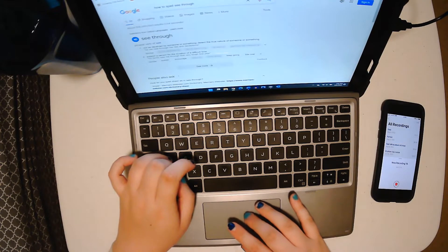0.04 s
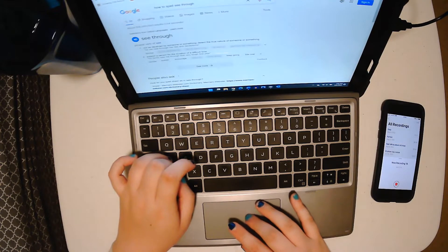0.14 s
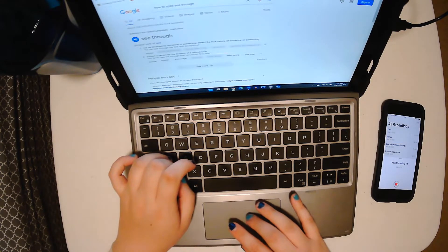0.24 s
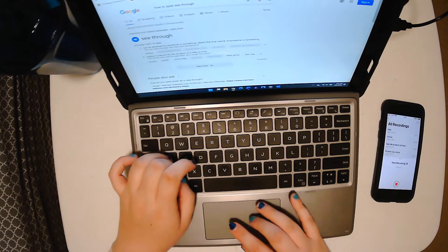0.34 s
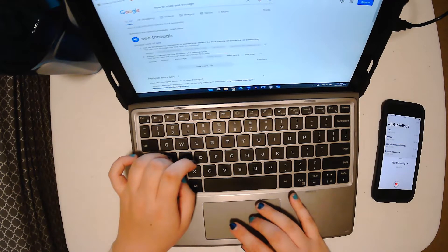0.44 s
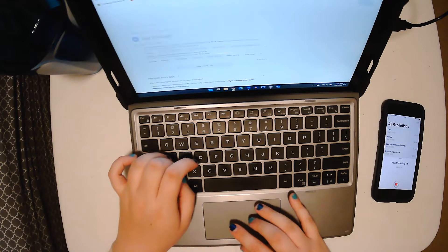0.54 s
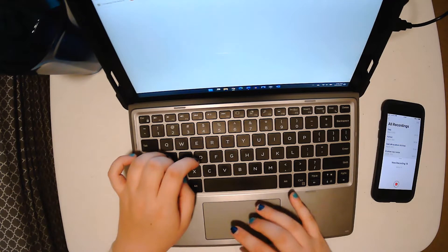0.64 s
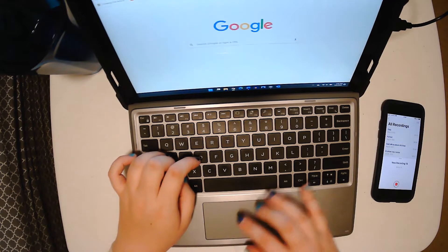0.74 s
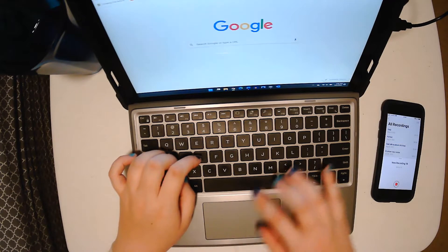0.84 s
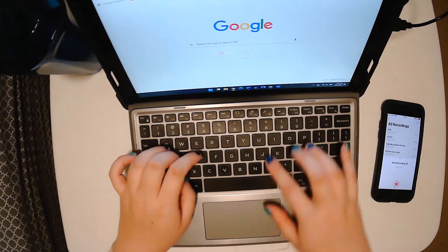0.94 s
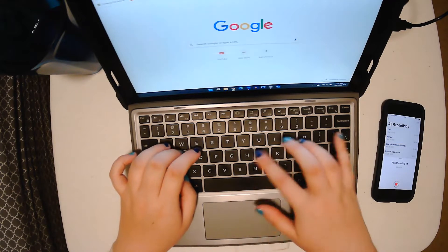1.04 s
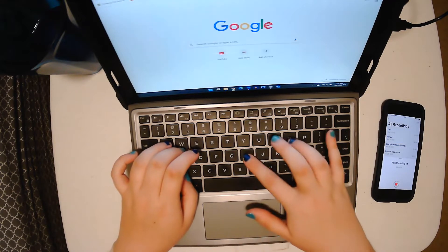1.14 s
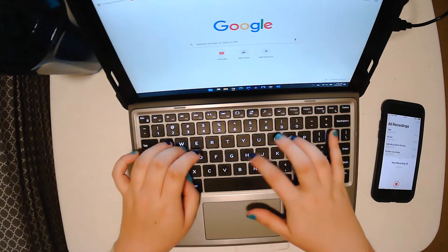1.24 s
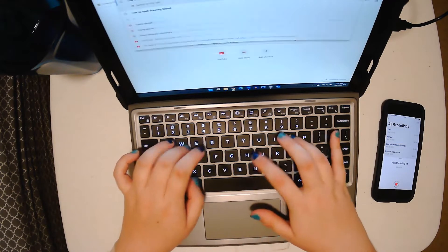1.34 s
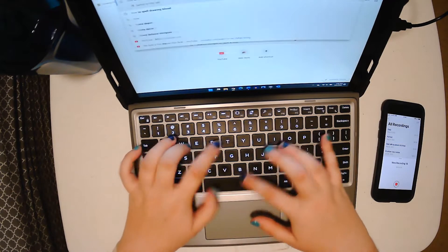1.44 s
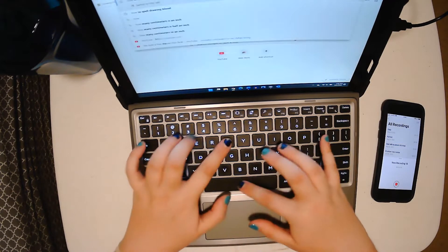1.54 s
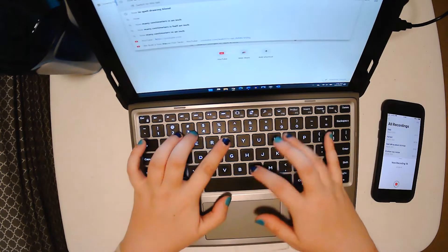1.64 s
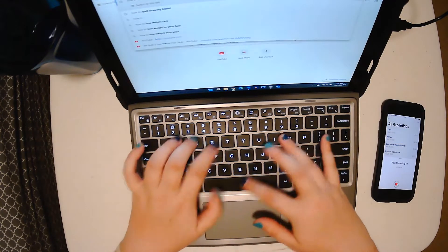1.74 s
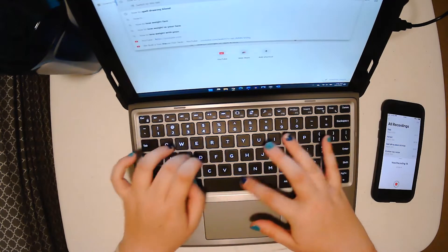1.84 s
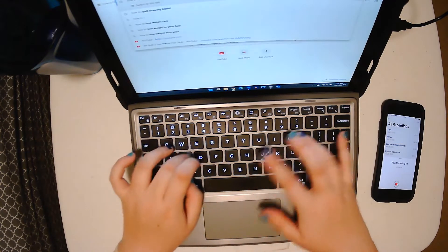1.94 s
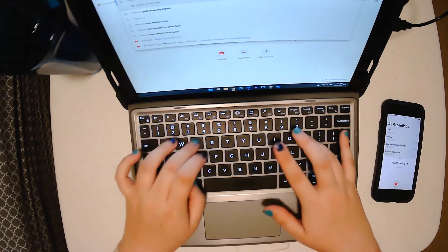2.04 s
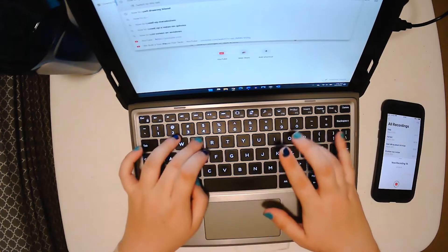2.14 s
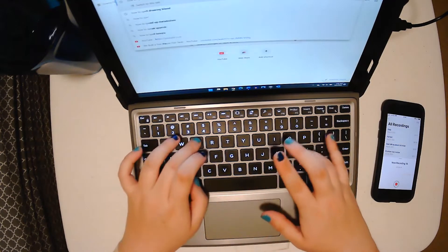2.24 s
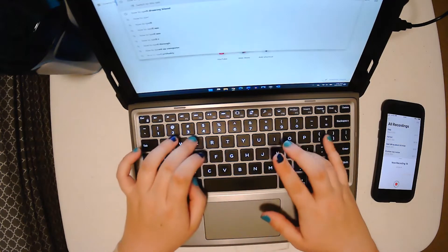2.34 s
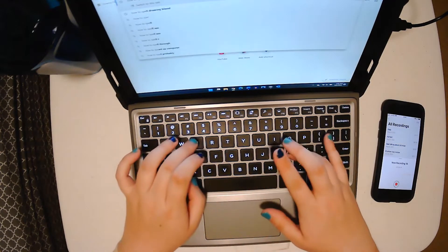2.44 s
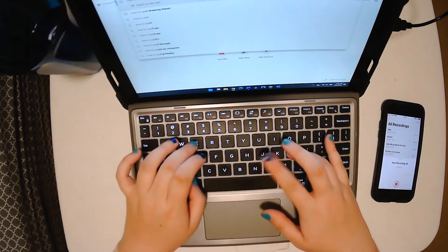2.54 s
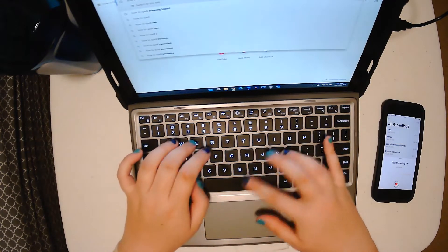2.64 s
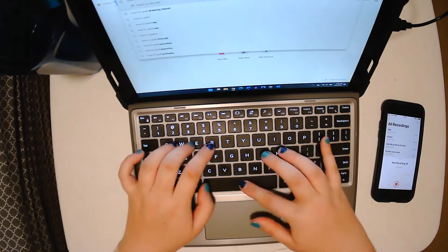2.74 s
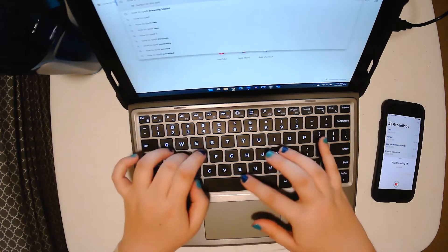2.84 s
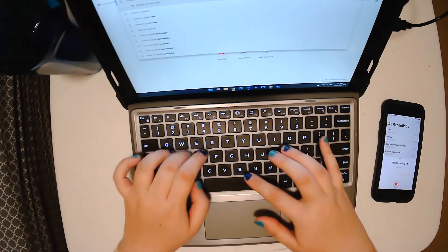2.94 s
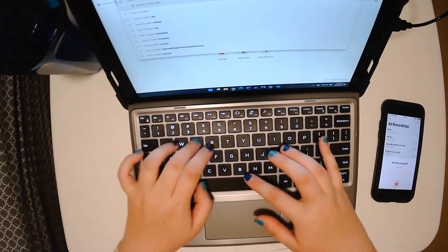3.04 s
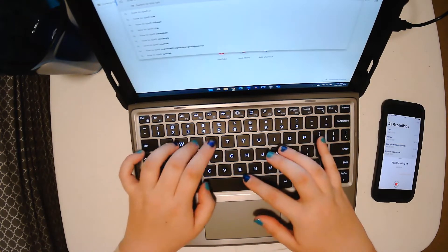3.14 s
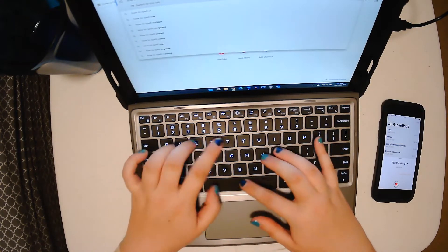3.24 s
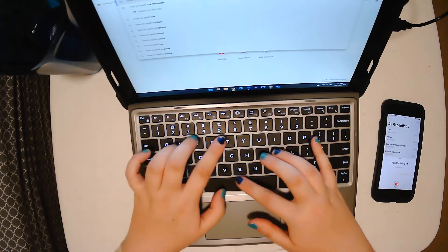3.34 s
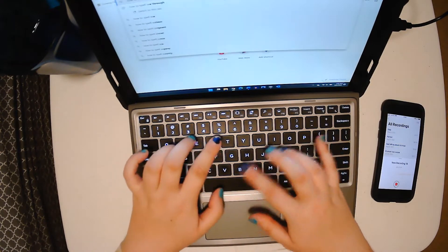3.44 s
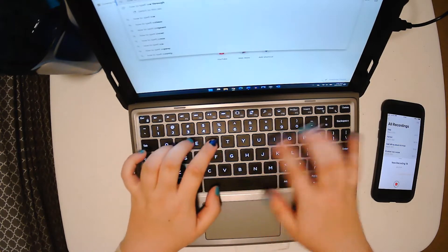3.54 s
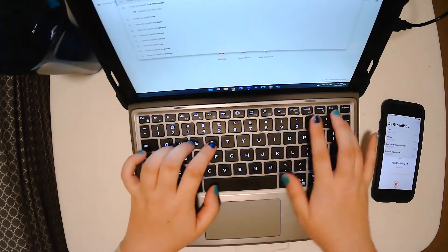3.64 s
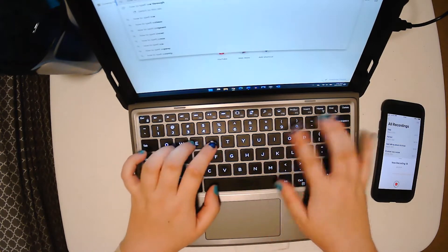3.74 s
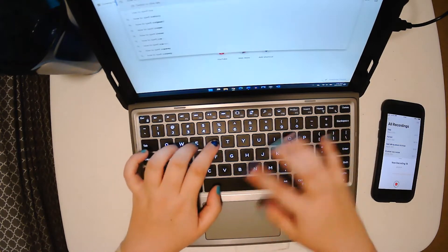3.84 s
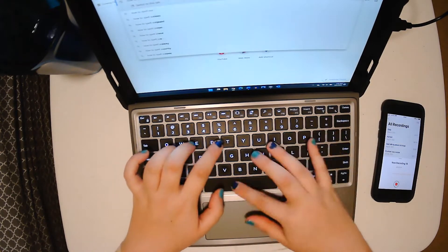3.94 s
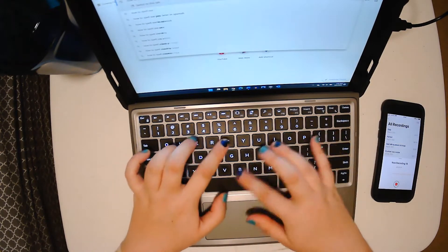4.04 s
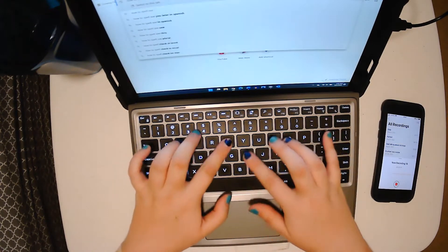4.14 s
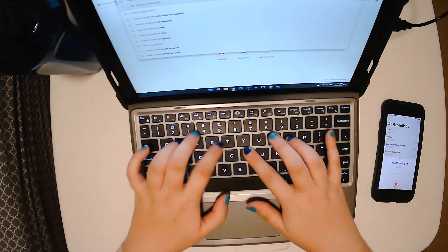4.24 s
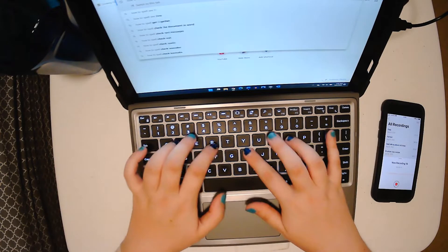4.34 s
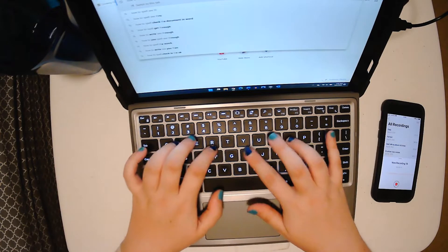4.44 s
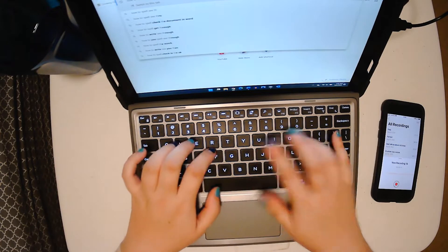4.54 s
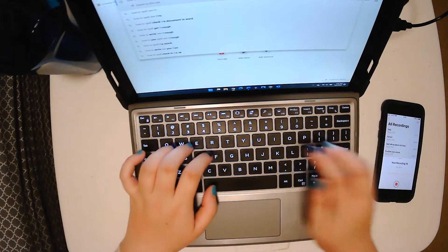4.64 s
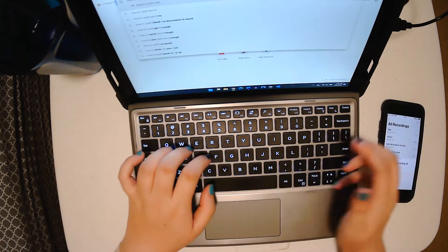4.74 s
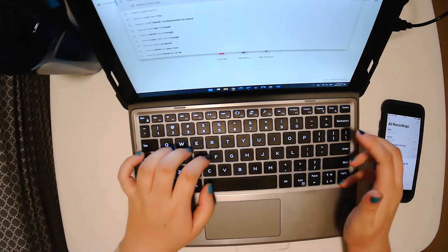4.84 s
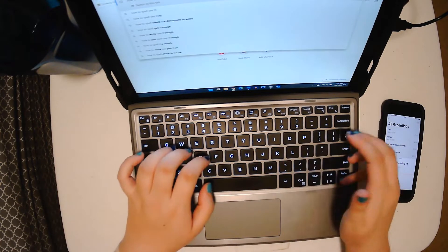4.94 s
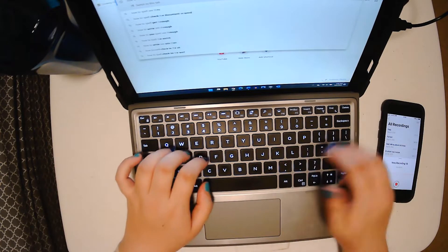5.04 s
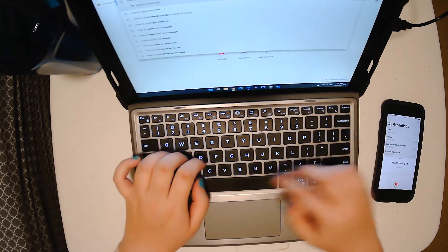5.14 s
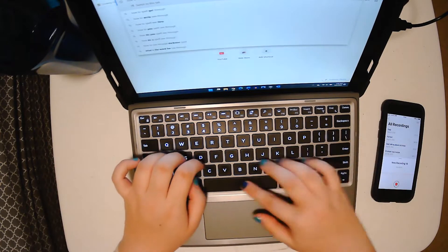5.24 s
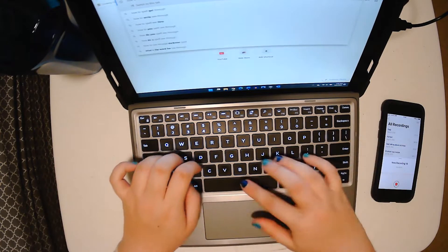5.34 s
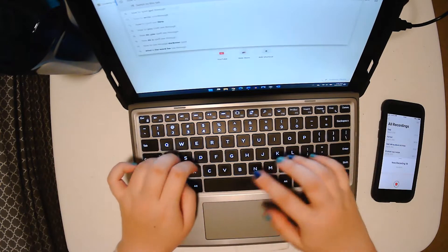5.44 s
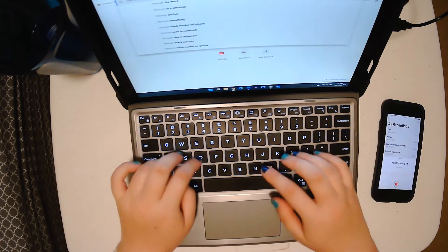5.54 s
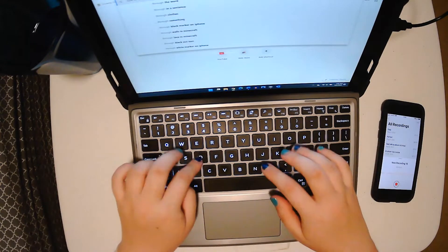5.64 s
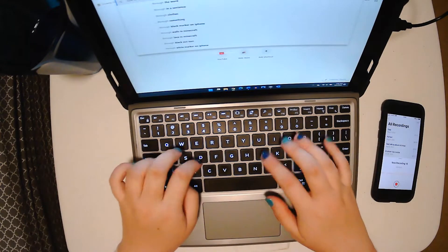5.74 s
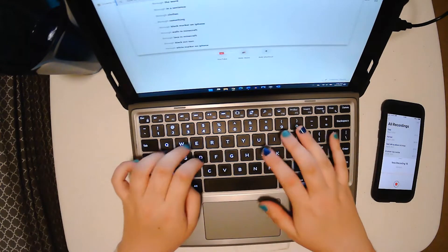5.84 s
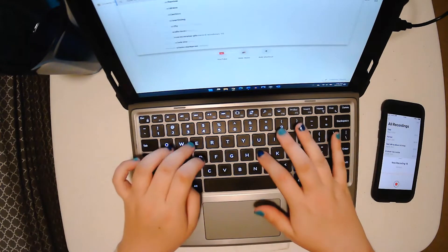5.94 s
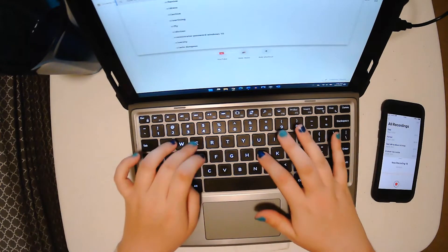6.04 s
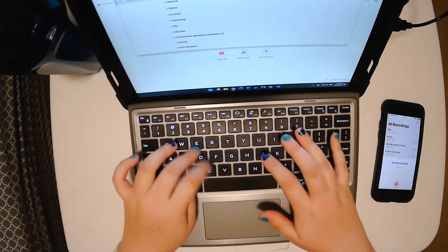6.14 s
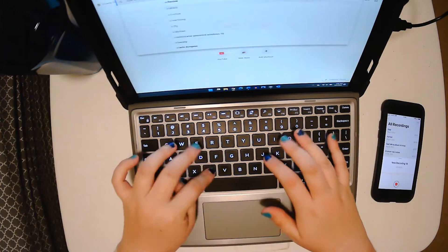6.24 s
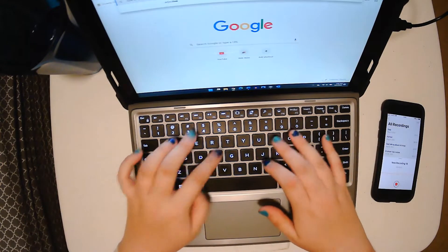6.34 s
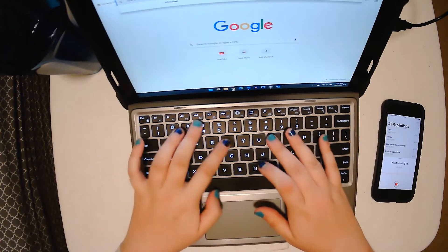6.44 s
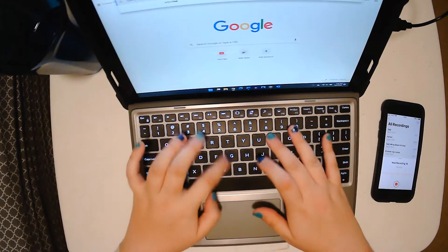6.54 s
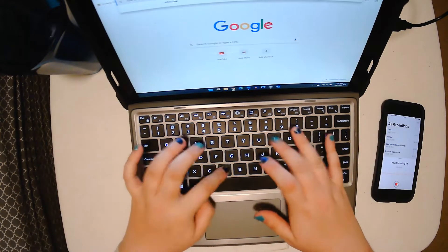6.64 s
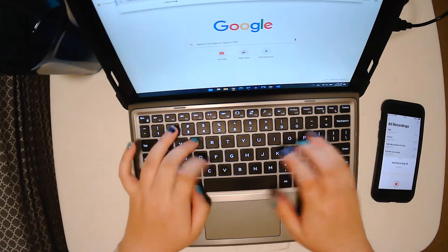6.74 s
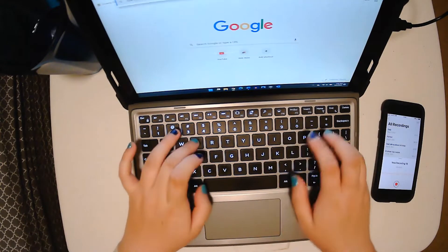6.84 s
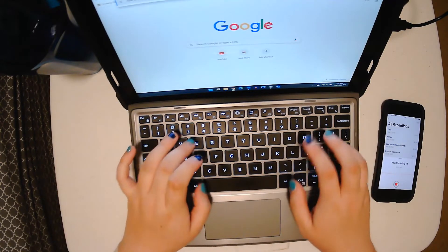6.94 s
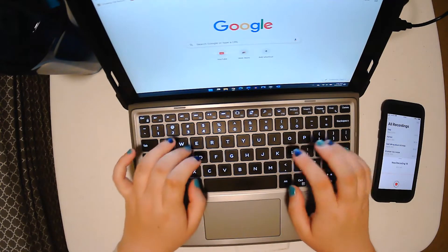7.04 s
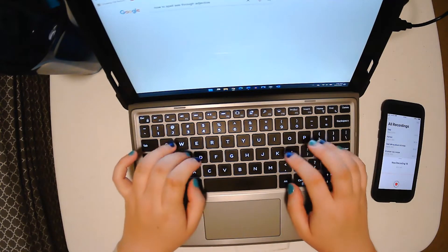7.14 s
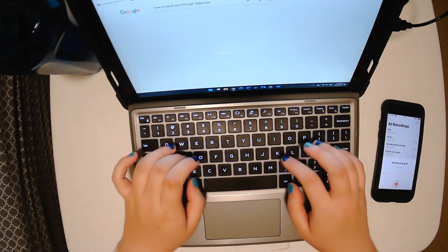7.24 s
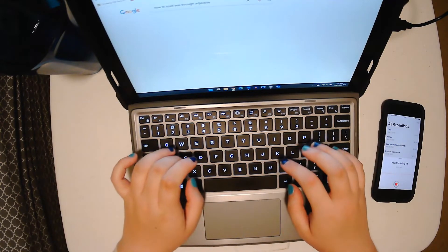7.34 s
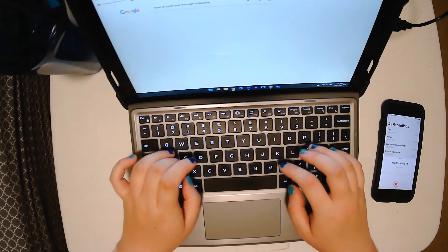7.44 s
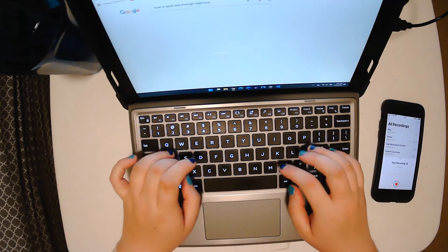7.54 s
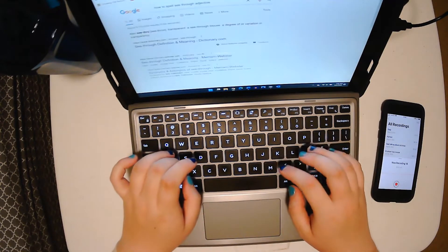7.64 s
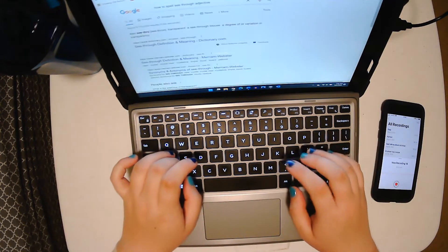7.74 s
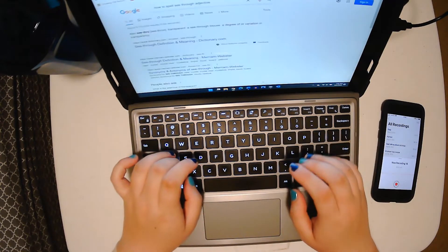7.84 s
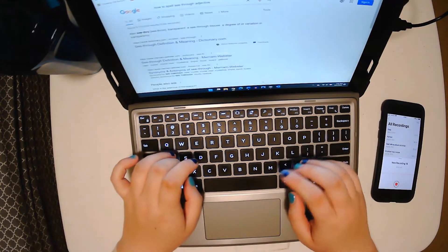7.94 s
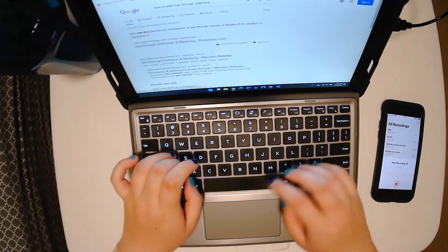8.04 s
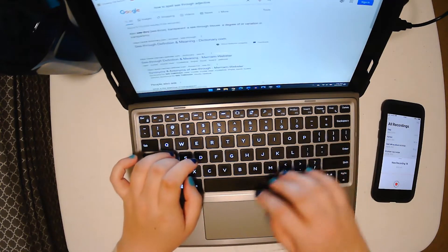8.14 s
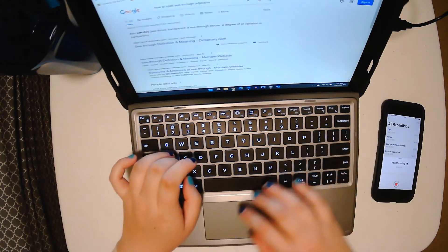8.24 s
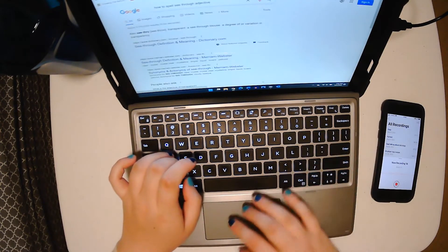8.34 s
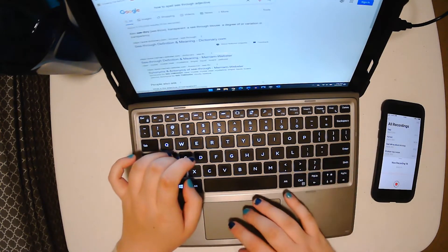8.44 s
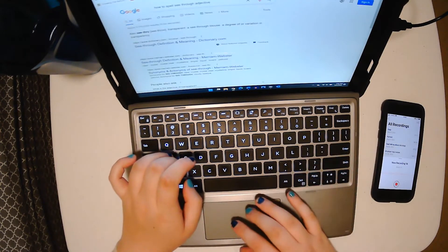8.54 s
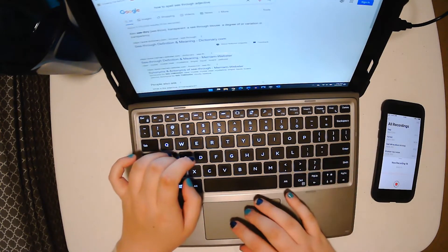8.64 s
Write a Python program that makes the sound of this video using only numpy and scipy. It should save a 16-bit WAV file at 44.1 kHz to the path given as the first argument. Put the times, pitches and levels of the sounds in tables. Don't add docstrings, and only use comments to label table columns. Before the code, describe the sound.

A quiet small room, close microphone, deep steady hum and faint air hiss. For the first 0.7 seconds almost nothing, just one faint low bump near 0.3. At about 0.8 to 0.9 a light tap, skin brush and tiny squeak. From 1.35 to 2.4 fingers type rapidly: crisp plastic snaps, short hollow key notes, low table thumps and heavier spacebar knocks near 1.8 to 2.0. Another run goes from 2.6 to 3.5, then scattered strokes from 3.8 to 4.6. Soft rubbing and faint touches around 4.7 to 5.0 as a hand shifts. Single keys at 5.1 to 5.9, including a strong spacebar clack at 5.4. A brisk run from 6.1 to 7.0 ends in a large key at 7.1 that bounces, rocks and rings the case until 7.2. Near stillness, with a faint thump at 7.6, then a brush and one short, solid touchpad knock at 8.26; hum remains. Treble briefly drops out now and then.

```python
import sys
import numpy as np
from scipy import signal
from scipy.fft import rfft, irfft, next_fast_len
from scipy.io import wavfile
from scipy.ndimage import uniform_filter1d, map_coordinates

SR = 44100
rng = np.random.default_rng(int(sys.argv[2]) if len(sys.argv) > 2 else 0)


def undo_db(level):
    steps = np.asarray(level, float) / 20
    return 10 ** steps


def to_wav(s):
    ch = np.atleast_2d(s).T
    pcm = np.round(np.clip(ch, -1, 1) * 32767)
    wavfile.write(sys.argv[1], SR, pcm.astype(np.int16))


N = 383229

# frequency in Hz, level in dB per Hz.
AIR_COLOUR = [(26, -43), (45, -2.5), (48, -11), (81, -16), (124, -14), (184, -21), (532, -33), (617, -34.5),
              (2290, -40.5), (12600, -51), (16500, -64)]
# pitch in Hz, level in dB rms.
HUM_TONES = [(26.6, -50.5), (119, -70)]
# frequency in Hz, t60 in seconds.
ROOM_DECAY = [(150, 0.38), (1000, 0.33), (4000, 0.33), (10000, 0.17), (15500, 0.083)]

# centre in seconds, level in dB, pitch in Hz, half length in seconds.
SQUEAKS = [(.775, -73, 5600, 0.031), (.83, -65, 2900, .02), (.872, -49.5, 2640, 0.015),
           (.865, -59, 5400, 0.027), (2.3, -70, 2320, 0.11), (4.4, -69, 2300, 0.18), (4.4, -73, 3500, .15),
           (4.8, -73, 2600, 0.11), (4.72, -71, 3330, .06), (7.77, -77, 2300, .1)]
# frequency in Hz, level in dB per Hz.
SKIN_COLOUR = [(250, 6), (480, 3), (1100, -1.5), (1900, -6), (2400, -2.5), (3000, -5.5), (3600, -7.5),
               (9500, -20.5), (15500, -32.5)]
# peak in seconds, level in dB, brightness in dB, fade in seconds.
SWEEPS = [(0.868, -50.5, 6, 0.016), (1.162, -56, 7.5, 0.071), (1.42, -68, 10.5, 0.032),
          (4.045, -62, -2, 0.047), (4.303, -51.5, 0, 0.016), (4.41, -66.5, -0.5, 0.15),
          (4.97, -57.5, 1, 0.072), (5.212, -60, 4, 0.009), (5.375, -58.5, 4, 0.055),
          (6.47, -58.5, 3.5, 0.011), (6.65, -63.5, 0, 0.063), (6.82, -61.5, -1, 0.11),
          (8.288, -56, 5.5, 0.028)]
# peak in seconds, level in dB, brightness in dB, fade in seconds.
SCUFFS = [(.78, -58.5, 3, 0.07), (1.28, -73, -8, 0.26), (1.72, -57.5, 1.5, 0.1), (1.97, -55.5, -0.5, 0.08),
          (2.06, -77, 13, 0.26), (4.53, -74, -7.5, 0.094), (4.693, -66, -10, 0.037), (4.8, -61.5, .5, 0.1),
          (5.445, -62, -3, 0.069), (6.155, -63, 2, 0.067)]

# frequency in Hz, level in dB, t60 in seconds.
DECK_MODES = [(167.4, -6, 0.11), (201.4, 3.5, 0.059), (280, -9, 0.054)]
# frequency in Hz, level in dB, t60 in seconds.
DRUM_MODES = [(197.6, 4, 0.19), (205, -11, 0.15)]
# frequency in Hz, level in dB, t60 in seconds.
TABLE_MODES = [(50.1, 3.5, 0.322), (73.55, 1.5, 0.32)]
# frequency in Hz, level in dB, t60 in seconds.
LID_MODES = [(105, 2.5, 0.13), (119.3, -0.5, 0.17)]
# frequency in Hz, level in dB.
CASE_COLOUR = [(300, -6), (400, -1), (520, -2.5), (650, -10), (780, -8), (1000, -21), (1600, -31)]
# start in seconds, deck in dB, then table, lid and case in dB re deck.
HOLLOW_BLOWS = [(1.479, -28.5, -2.5, -3.5, -1.5), (2.181, -33.5, 1.5, -2, 1), (2.254, -41, -7, -13, 0.5),
                (3.83, -35.5, 4, -9, 0), (3.915, -39.5, -4, -9, -3.5), (3.988, -31, -7, -5, -8.5),
                (4.456, -39, -9, -1, -3), (4.551, -39.5, -15, -3.5, -3), (6.135, -28.5, 2.5, 1, 5),
                (6.223, -41.5, -4, -6, 3), (6.726, -32, -1, -24, 4), (7.582, -50.5, 2.5, -3, -9.5)]
# start in seconds, deck in dB, then table, lid and case in dB re deck.
PLAIN_BLOWS = [(0.333, -40, 2, -2.5, -18), (0.87, -45.5, -5, -4.5, 3), (1.689, -29.5, -4.5, -5, -3.5),
               (1.841, -29.5, -3, -8.5, -3.5), (1.916, -39.5, -16, -6, 1), (2.062, -38, -9, 4.5, -9),
               (2.29, -39.5, -4, 5, -6.5), (2.36, -39.5, -6.5, -3, -16), (2.613, -33, -0.5, -5, -8),
               (2.678, -42, -1, 2, -3.5), (2.798, -39.5, -18, -4, -3), (3.231, -35.5, -12, -1.5, -11.5),
               (3.293, -41, -2, -3.5, -22), (4.054, -39.5, -1, -16, -16), (4.309, -34.5, -10, -3, -3),
               (4.397, -39, -18, -3.5, -2.5), (5.14, -36, -3, -5.5, -21), (5.641, -34, -5.5, -4.5, -1.5),
               (6.2, -35.5, -10, -1.5, -2), (6.373, -38.5, 5.5, -5.5, -13.5), (6.48, -38, -3, -8.5, -10),
               (6.693, -42.5, -9, 1, -2), (6.798, -33, -3.5, -8.5, -3), (6.949, -31, 1.5, -4.5, -2.5)]
# start in seconds, deck in dB, then table, lid and case in dB re deck.
WOODY_BLOWS = [(1.358, -37.5, -6, 1.5, -3.5), (1.43, -43, 1, -8, 4.5), (1.553, -32.5, -8, -2.5, -2),
               (1.615, -36, -9, -4.5, -7), (2.141, -38.5, 3.5, -14, -11), (2.737, -51, 12, 12.5, 1),
               (3.03, -28, -5.5, -8.5, -12.5), (3.12, -41, -3, -0.5, -10), (3.423, -34, -11, -1, -1.5),
               (5.224, -38.5, -6.5, -8, -11.5), (5.756, -36, 0, 0, -9), (5.859, -40, -1, -3, -17),
               (6.316, -41, -6, -2, -1), (6.62, -36, 0.5, -10, 3), (6.872, -35, -11, -4, -15),
               (7.036, -33, -4, -8.5, -10)]
CASE_TONE_DB = [
    -6.5,
    -0.5,
    7,
]
# start in seconds, deck in dB, case in dB re deck, case brightness in dB.
BAR_BLOWS = [(1.769, -30, -7.5, -11), (1.954, -25.5, -3, 2.5), (2.03, -29, -12.5, 2), (2.861, -27, -6, 8),
             (2.959, -29.5, -11, -19), (3.5, -29, -11.5, -2), (4.105, -28, -3.5, 15),
             (4.184, -30.5, -14, -1), (5.421, -27, -5, -3.5), (5.498, -27.5, -10, -1)]
# start in seconds, deck in dB, case in dB re deck, brightness in dB.
TAPS = [(0.774, -52, 8.5, -7), (1.939, -38, 10, 0), (4.373, -42.5, -2, -13), (4.687, -65, 16.5, 17),
        (4.875, -65, 13, 14), (5.62, -61, 17, 6), (7.112, -43, 5.5, 5), (7.127, -47, 9, 13),
        (7.14, -43, 9, -2), (7.16, -45, 3, -6), (5.776, -42.5, 5, 17)]

# start in seconds, level in dB.
PAD_TAP = (8.2625, -22)
# frequency in Hz, level in dB, t60 in seconds.
PAD_MODES = [(304, 8.5, 0.0068), (535, -2, 0.014), (2100, -11.5, 0.008)]

# start in seconds, level in dB, pitch in Hz.
PLATE_NOTES = [(1.4676, -22, 1660), (1.5557, -32, 1300), (1.6867, -25.5, 1760), (1.8357, -23.5, 1656),
               (1.954, -27, 1130), (2.0265, -40, 1600), (2.0563, -42, 1440), (2.169, -21, 1427),
               (2.61, -33.5, 1440), (2.8619, -28, 1250), (2.9572, -47, 1520), (3.426, -31.5, 1910),
               (3.4966, -35, 1420), (3.913, -43, 1700), (4.106, -32, 1390), (4.1774, -42, 1520),
               (4.3066, -43, 1140), (4.397, -43.5, 1980), (5.223, -37, 1020), (5.4207, -25, 1140),
               (5.4939, -40, 1700), (6.136, -28, 1670), (6.6214, -31, 1160), (6.727, -23.5, 1670),
               (6.9425, -34.5, 1380), (7.034, -31, 1280), (7.1125, -34, 1760)]
# start in seconds, level in dB, pitch in Hz.
CASE_NOTES = [(0.87, -38.5, 484), (1.554, -38, 640), (1.685, -31, 498), (1.953, -23, 510),
              (2.027, -44, 450), (2.86, -31.5, 443), (2.957, -37, 432), (3.027, -42, 786),
              (3.425, -36.5, 970), (3.496, -37, 442), (3.982, -36.5, 457), (4.106, -35.5, 574),
              (4.178, -37.5, 433), (4.307, -39, 517), (4.396, -42, 530), (4.508, -51, 600),
              (4.551, -40.5, 515), (4.687, -50, 603), (4.881, -48.5, 884), (5.422, -34.5, 516),
              (5.496, -42, 450), (5.64, -30, 494), (5.776, -32.5, 771), (6.135, -25, 475),
              (6.621, -24.5, 513), (6.728, -31, 467), (7.113, -39, 596), (8.262, -36, 566)]
# start in seconds, level in dB, pitch in Hz.
CAP_NOTES = [(0.7779, -34, 5470), (0.8682, -28, 5300), (1.468, -21.5, 4140), (1.6858, -20.5, 7300),
             (1.8363, -30, 8230), (1.952, -15, 6740), (2.0256, -22.5, 6270), (2.168, -15, 9800),
             (2.61, -24, 5960), (2.8598, -20.5, 7450), (3.027, -31, 9700), (3.4236, -18, 7420),
             (3.497, -22.5, 4970), (3.823, -16, 7940), (4.1051, -24, 7500), (4.1774, -28, 9000),
             (5.1374, -34, 9100), (5.4202, -15, 7350), (5.4929, -34, 7700), (6.135, -19.5, 3450),
             (6.7266, -26, 8920), (6.943, -29, 6970), (7.0085, -25, 9270), (7.035, -18, 6570),
             (7.1107, -15.5, 6130)]
# start in seconds, level in dB, pitch in Hz.
DECK_NOTES = [(1.468, -32, 300), (1.837, -31, 384), (2.168, -25, 298), (3.425, -32.5, 296),
              (3.828, -32.5, 310), (3.914, -38, 360), (5.225, -50, 304), (6.134, -33, 377),
              (6.947, -33, 300), (8.262, -33, 272)]
# start in seconds, level in dB, pitch in Hz.
PLATE_PARTNERS = [(1.467, -29, 1300), (1.468, -26.5, 700), (1.75, -43, 1100), (1.937, -31, 1300),
                  (1.941, -30, 900), (1.946, -32, 1450), (1.837, -28, 1280), (1.954, -26, 1760),
                  (2.169, -28.5, 2340), (2.169, -35, 750), (2.245, -37.5, 1000), (2.609, -32, 1730),
                  (2.796, -34, 760), (2.861, -35, 2100), (5.421, -25, 1490), (6.135, -23, 1190),
                  (6.134, -27, 2450), (6.622, -37, 1890), (6.729, -26, 2090), (7.113, -41, 2100),
                  (8.263, -40, 1270)]
# gain in dB, rise in seconds, t60 in seconds.
NOTE_SHAPES = [
    (0, 0.00094, 0.018),
    (-2, 0.0014, 0.079),
    (-6, 0.00049, 0.0095),
    (-2, 0.0015, 0.045),
    (-1, 0.00086, 0.021),
]
# frequency in Hz, level in dB, t60 in seconds.
BIG_KEY_MODES = [(224, 2.5, 0.22), (292.4, -4.5, 0.22), (330, 2.5, 0.11), (473, -2.5, 0.13),
                 (561.5, -2, 0.13), (600, -2, 0.11), (908, -10, 0.12), (978, -6, .07), (1195, -16, .1),
                 (1294, -8.5, 0.051)]
# start in seconds, level in dB.
BIG_KEY_LANDS = [
    (7.126, -33.5),
    (7.133, -34.5),
    (7.158, -43.5),
    (7.198, -50),
]

# frequency in Hz, level in dB.
SNAP_COLOUR = [(1500, -9), (3000, -3.5), (4500, 1.5), (6500, 3.5), (9000, -0.5), (12000, -13.5),
               (15500, -29)]
# frequency in Hz, level in dB.
PLATE_COLOUR = [(700, -50), (1100, 7), (1500, 4.5), (2000, 0), (2800, -10.5), (4000, -14.5)]
# snap in seconds, level in dB, plate knock in dB re snap, brightness in dB.
CRISP = [(1.468, -25, 1, 8), (1.8375, -23, 4.5, 24), (2.169, -20.5, 2.5, 41), (2.724, -37.5, 2, 11),
         (2.736, -34, 1, 0), (2.794, -38, -2, 2), (3.0282, -33, 1, 32), (3.8236, -23.5, -20, 11),
         (3.8277, -28.5, -8, 15), (4.106, -21, 3.5, 7), (4.5478, -41.5, -22, 3),
         (5.4213, -18.5, -0.5, -4.5), (5.7467, -33, -7, 11), (6.227, -40, 1, 3), (6.366, -36.5, -10, 3),
         (6.728, -24.5, 5, 0), (6.9391, -32.5, -9, -6), (6.944, -33.5, 0.5, 14), (7.035, -23, 0.5, 13)]
# snap in seconds, level in dB, plate knock in dB re snap, brightness in dB.
FIRM = [(0.78, -40, -19, -4), (2.61, -28, -5, 2), (2.674, -42, 1, 1), (3.022, -35, 2, -3),
        (3.4252, -27, 1.5, 2.5), (5.14, -33.5, -8, 2), (5.6412, -37, 7.5, -2), (5.777, -35, 2, 12),
        (6.1358, -21, -1, 2), (6.7833, -38.5, 2, 10), (7.01, -30.5, -7, 8)]
# snap in seconds, level in dB, plate knock in dB re snap, brightness in dB.
LOOSE = [(1.3454, -47.5, 1, 16), (1.467, -36.5, 14, 15), (1.552, -36.5, 6, -2), (1.686, -30.5, 6.5, 1.5),
         (1.768, -33.5, -3, 4), (1.908, -46.5, 10, 15), (1.9535, -24, -1.5, 7), (2.026, -33, -1, 3),
         (2.0548, -38, 9.5, 0), (2.604, -39.5, 7.5, 0), (2.8608, -27.5, 3.5, -9), (2.957, -38.5, 2.5, 14),
         (3.4966, -31, -4, 7), (3.912, -41, 0.5, 10), (3.9828, -48.5, 15, 14), (4.098, -39, -1, 9),
         (4.179, -30.5, -11, 7), (5.224, -39, 6, 1), (5.494, -32, -5, 8), (6.6207, -38, 9, 16),
         (6.723, -38, -3, 14), (7.0046, -42, -8.3, 7), (7.113, -25.5, -3, 14), (8.2615, -38.5, -5, -2)]
# snap in seconds, level in dB, plate knock in dB re snap, brightness in dB.
DRAGGED = [(1.939, -48, 14, -16), (2.853, -39.5, -13, 14), (3.415, -45, -4, 2), (5.4131, -40.5, -6, 7)]
# snap in seconds, level in dB, plate knock in dB re snap, brightness in dB.
SLID = [(0.8686, -38.5, -21, 0), (2.286, -50, 13.5, 2), (2.963, -42.5, -5, 8), (3.2281, -54.5, 16, -1),
        (5.861, -53, 9, 7)]
# snap in seconds, level in dB, plate knock in dB re snap.
TICKS = [(1.3553, -52, 5), (1.5412, -44, -5), (1.6096, -46.5, 10.5), (1.749, -42.5, 3), (1.8336, -45, 17),
         (2.1655, -41, 9), (2.2423, -44, 2), (2.799, -41, -11), (3.1136, -49, 6), (3.9776, -43, 3),
         (4.173, -43, -28), (4.3934, -49, 2), (4.554, -45, -7), (4.681, -66, 28), (6.203, -52, 16),
         (6.3928, -47, 6.5), (6.689, -49.5, 12), (6.9932, -44, -7), (3.501, -34.5, -7), (6.132, -39, 0),
         (2.361, -54, 0), (5.112, -62, 9), (4.42, -50, -7), (7.095, -57, -10), (3.514, -47, -5),
         (5.499, -39, -5), (4.046, -50, 3), (6.238, -51, 6), (6.151, -46, 9)]
# rise in ms, t60 in seconds.
TOUCH_SHAPES = [
    (0.13, 0.0074),
    (0.64, 0.0068),
    (1.04, 0.018),
    (1.7, 0.057),
    (7.4, 0.021),
    (0.47, 0.0093),
]

DROPOUTS = [.525, .652, 2.443, 2.509, 2.834, 3.534, 3.875, 3.94, 4.64, 4.835, 5.626, 6.072, 6.305, 6.796,
            6.986, 7.82, 8.335, 2.553, 8.205, 8.547]
BLIPPED_DROPOUTS = {.803: [1900, 5200, 11200], 2.894: [5200, 6200], 3.0: [5200, 6600], 3.13: [2300, 5300,
                    6300, 9000, 9800], 4.298: [2000, 5700, 10200, 11000], 4.887: [2200, 2700, 4000, 4800,
                    11800, 13100]}


def unit(x):
    return x / np.sqrt(np.mean(x ** 2) + 1e-20)


def along(points, hz):
    f, v = np.transpose(points)
    return np.interp(np.log(hz + 1), np.log(f + 1), v)


def noise(colour, size, lean_db=0):
    m = next_fast_len(size + 8192)
    hz = np.fft.rfftfreq(m, 1 / SR)
    closed = [(colour[0][0] / 2, -80), *colour, (colour[-1][0] * 2, -80)]
    gain = undo_db(along(closed, hz) + lean_db * np.log2(hz + 1))
    return unit(irfft(rfft(rng.standard_normal(m)) * gain, m)[:size])


def wobble(rate):
    knots = rng.standard_normal(int(N * rate / SR) + 4)
    return map_coordinates(knots, [np.arange(N) * rate / SR])


def burst(carrier, shape):
    x = carrier * shape
    return x * np.linalg.norm(shape) / np.linalg.norm(x)


def ring(modes, t, attack, scatter_db, detune):
    hz, db, t60 = np.transpose(modes)[:, :, None]
    luck = rng.standard_normal((2, len(modes), 1))
    gain = undo_db(db + scatter_db * luck[0] - 60 * t / t60)
    tones = gain * np.sin(2 * np.pi * hz * (1 + detune * luck[1]) * t)
    envelope = (1 - np.exp(-t / attack)) * undo_db(-60 * t / t60.max())
    return burst(np.sum(tones, 0) / np.sum(gain, 0), envelope)


def background():
    still_db = -1 * (np.arange(N) < 0.68 * SR)
    bed = undo_db(-60 + still_db + 1.35 * wobble(10.0)) * noise(AIR_COLOUR, N)
    for hz, db in HUM_TONES:
        turns = np.cumsum(hz * (1 + 0.004 * wobble(2.8))) / SR
        bed += np.sqrt(2) * undo_db(db + 0.65 * wobble(2.88)) * np.sin(2 * np.pi * turns)
    return bed


def room(x):
    hz, t, z = signal.stft(x, SR, nperseg=256)
    keep = undo_db(-120 * t[1] / along(ROOM_DECAY, hz))
    power = uniform_filter1d(np.abs(z) ** 2, size=3, axis=0)
    stored = np.array([signal.lfilter([0, 0, 1 - k], [1, -k], p) for k, p in zip(keep, power)])
    diffuse = signal.stft(rng.standard_normal(N), nperseg=256)[2]
    tail = diffuse / np.std(diffuse) * np.sqrt(np.abs(stored)) * (hz[:, None] > 200)
    return signal.istft(tail, nperseg=256)[1][:N]


def squeaks():
    out, t = np.zeros(N), np.arange(N) / SR
    width = 0.041
    for s, db, hz, half in SQUEAKS:
        part = slice(max(round((s - 2 * half) * SR), 0), round((s + 2 * half) * SR))
        band = signal.butter(1, [hz * (1 - width), hz * (1 + width)], "band", fs=SR)
        hiss = unit(signal.lfilter(*band, rng.standard_normal(SR)))[:len(t[part])]
        out[part] += undo_db(db) * np.exp(-((t[part] - s) / half) ** 2) * hiss
    return out


def rubs():
    t, low, high = np.arange(N) / SR, np.zeros(N), np.zeros(N)
    strokes = [(*row, 0.97) for row in SWEEPS] + [(*row, 0.38) for row in SCUFFS]
    for s, db, bright_db, fade, swell in strokes:
        reach = np.abs(t - s) / np.where(t < s, swell * fade, fade)
        stroke = np.exp(-reach * reach * reach)
        low += undo_db(db - 0.5 - bright_db) * stroke
        high += undo_db(db - 5.0 + bright_db) * stroke
    grain = unit(undo_db(1.2 * wobble(600) + 1.3 * wobble(40)))
    return grain * (low * noise(SKIN_COLOUR, N, lean_db=-1.0) + high * noise(SKIN_COLOUR, N, lean_db=7.5))


def thumps():
    out, t = np.zeros(N + SR), np.arange(SR // 3) / SR
    hollow = noise(CASE_COLOUR, N + SR, lean_db=-6.0)
    woody = noise(CASE_COLOUR, N + SR, lean_db=7.5)
    buzz = (1 - np.exp(-t / 0.00046)) * undo_db(-60 * t / 0.099)
    choke = undo_db(-1.0 - 11.5 / (1 + np.exp((0.024 - t) / 0.0022)))

    blows = []
    for rows, tone_db in zip((HOLLOW_BLOWS, PLAIN_BLOWS, WOODY_BLOWS), CASE_TONE_DB):
        blows += [(*row, tone_db, DECK_MODES) for row in rows]
    blows += [(s, db, -19, -13, *case, DRUM_MODES) for s, db, *case in BAR_BLOWS]
    blows += [(s, db, -6.5, -4.5, *case, DECK_MODES) for s, db, *case in TAPS]

    for s, db, table_db, lid_db, case_db, woody_db, deck in blows:
        span = slice(round(s * SR), round(s * SR) + len(t))
        blow = undo_db(2.5) * ring(deck, t, 0.0033, scatter_db=5.5, detune=0.039)
        if deck is DRUM_MODES:
            blow *= choke
        blow += undo_db(table_db + 3.0) * ring(TABLE_MODES, t, 0.012, scatter_db=6.0, detune=0.087)
        blow += undo_db(lid_db + 6.5) * ring(LID_MODES, t, 0.012, scatter_db=0.5, detune=0.03)
        case = undo_db(-woody_db) * hollow[span] + undo_db(woody_db - 4.5) * woody[span]
        blow += undo_db(case_db - 4.5) * burst(case, buzz)
        out[span] += undo_db(db) * blow
    return out[:N]


def pad():
    out, t = np.zeros(N), np.arange(SR // 10) / SR
    s, db = PAD_TAP
    out[round(s * SR):][:len(t)] = undo_db(db) * ring(PAD_MODES, t, 0.00032, scatter_db=5.5, detune=0)
    return out


def notes():
    out, t = np.zeros(N + SR), np.arange(SR // 4) / SR
    tones = []
    kinds = PLATE_NOTES, CASE_NOTES, CAP_NOTES, DECK_NOTES, PLATE_PARTNERS
    for rows, (gain_db, rise, t60) in zip(kinds, NOTE_SHAPES):
        tones += [(s, db + gain_db, hz, rise, t60) for s, db, hz in rows]
    for s, db in BIG_KEY_LANDS:
        tones += [(s, db + mode_db, hz, 0.002, t60) for hz, mode_db, t60 in BIG_KEY_MODES]
    for s, db, hz, rise, t60 in tones:
        envelope = undo_db(db - 60 * t / t60) * (1 - np.exp(-t / rise))
        out[round(s * SR):][:len(t)] += envelope * np.sin(2 * np.pi * hz * t)
    return out[:N]


def clicks():
    out, t = np.zeros(N + SR), np.arange(-SR // 40, SR // 8) / SR
    early, late = np.minimum(t, 0), np.maximum(t, 0)
    dull, bright = noise(SNAP_COLOUR, N + SR, lean_db=-6.5), noise(SNAP_COLOUR, N + SR, lean_db=16.0)
    spikes = undo_db(6 * wobble(2500))
    plate = noise(PLATE_COLOUR, N + SR)
    knock = (1 - np.exp(-late / 0.0013)) * undo_db(-60 * late / 0.018)
    lead_in = undo_db(-22) * (t > -0.0038)

    ticks = [(*tick, 4) for tick in TICKS]
    kinds = CRISP, FIRM, LOOSE, DRAGGED, SLID, ticks
    contacts = [(*row, *touch) for rows, touch in zip(kinds, TOUCH_SHAPES) for row in rows]
    for s, db, knock_db, bright_db, rise_ms, t60 in contacts:
        start = round((s + t[0]) * SR)
        span = slice(start, start + len(t))
        scrape = undo_db(9000 * early / rise_ms)
        envelope = np.maximum(scrape, lead_in) * undo_db(-60 * late / t60)
        rattle = undo_db(-0.8 * bright_db) * dull[span] + undo_db(0.17 * bright_db) * bright[span]
        rattle *= spikes[start % (N - len(t)):][:len(t)]
        out[span] += undo_db(db - 4.5) * burst(rattle, envelope)
        out[span] += undo_db(db + knock_db - 5.5) * burst(plate[span], knock)
    return out[:N]


def scene():
    caps, chassis, tones = clicks(), thumps() + pad(), notes()
    airborne = caps + chassis + undo_db(-5.5) * tones
    airborne = signal.sosfilt(signal.butter(2, 260, "high", fs=SR, output="sos"), airborne)
    keys = caps + tones + chassis + undo_db(-12.5) * room(airborne)
    return (keys + rubs() + background() + squeaks())[None]


def band_limit(x):
    return signal.sosfilt(signal.butter(12, 16650, fs=SR, output="sos"), x)


def record(dry):
    hz, t, z = signal.stft(dry, SR, nperseg=768, noverlap=640)
    gaps = []
    for s in DROPOUTS:
        lucky = rng.random(len(hz) // 3 + 1) < 300 / (hz[::3] + 2000)
        gaps.append((s, 0.005, np.repeat(lucky, 3)[:len(hz)]))
    for s, kept in BLIPPED_DROPOUTS.items():
        close = np.abs(hz[:, None] - kept) < 90 + 0.012 * hz[:, None]
        gaps.append((s, 0.003 + 0.0014 * len(kept), np.any(close, 1)))
    for s, half, blips in gaps:
        near = np.abs(t - s) < 0.05
        hole_db = -27 * np.exp(-np.abs((t[near] - s) / half) ** 3)
        blip_db = 9 * np.exp(-((t[near] - s) / 0.018) ** 2)
        z[..., near] *= undo_db((hz[:, None] > 1300) * np.where(blips[:, None], blip_db, hole_db))
    mix = signal.istft(z, SR, nperseg=768, noverlap=640)[1][:, :N]
    return band_limit(mix)


dry = scene()
out = record(dry)
to_wav(out)
```